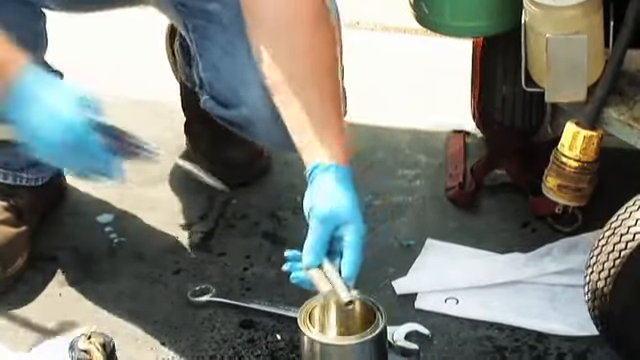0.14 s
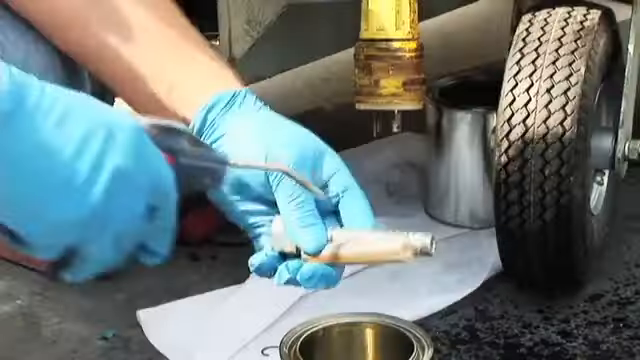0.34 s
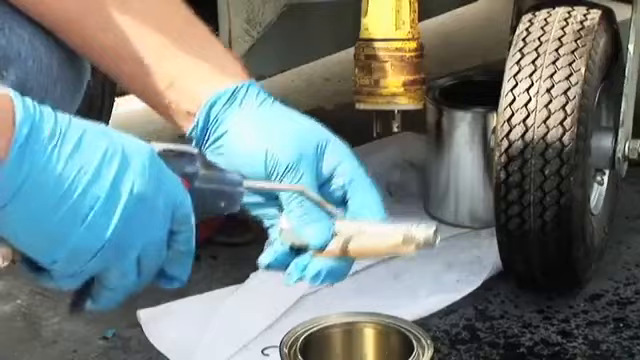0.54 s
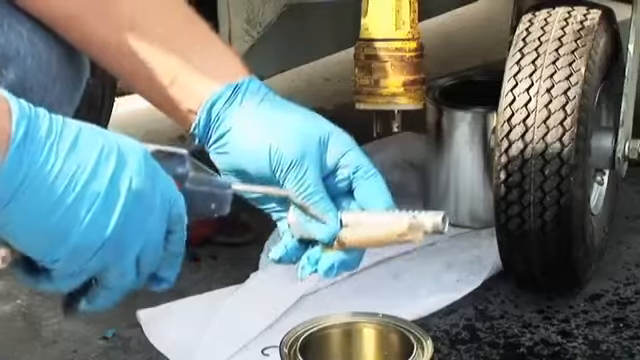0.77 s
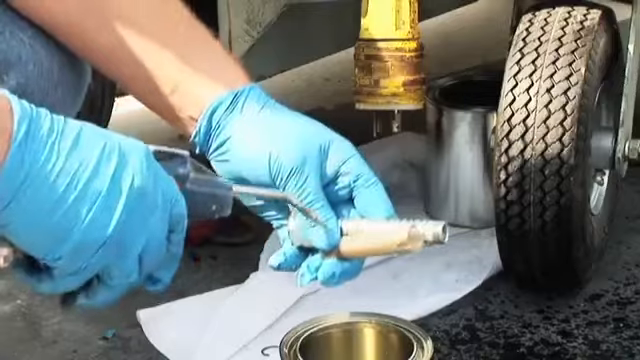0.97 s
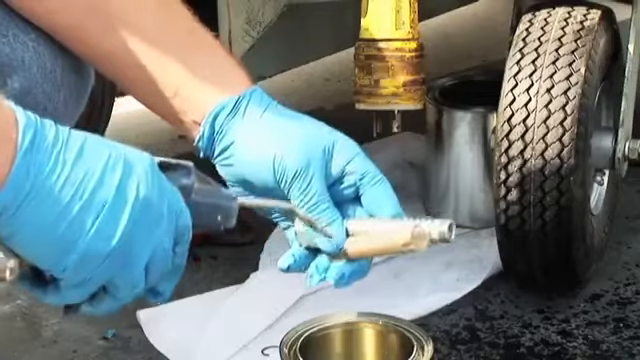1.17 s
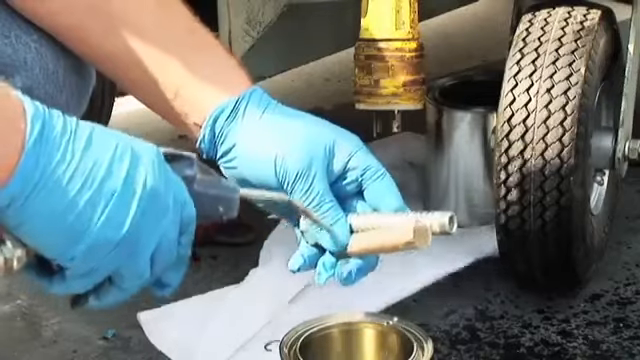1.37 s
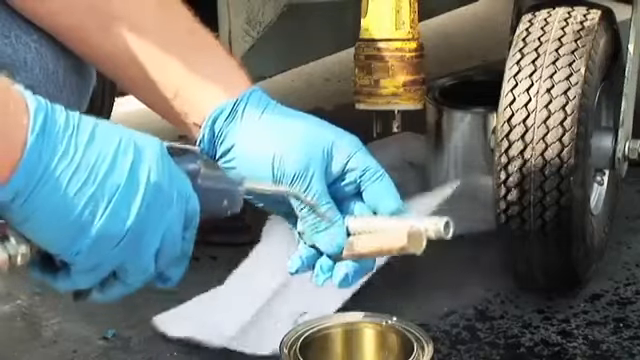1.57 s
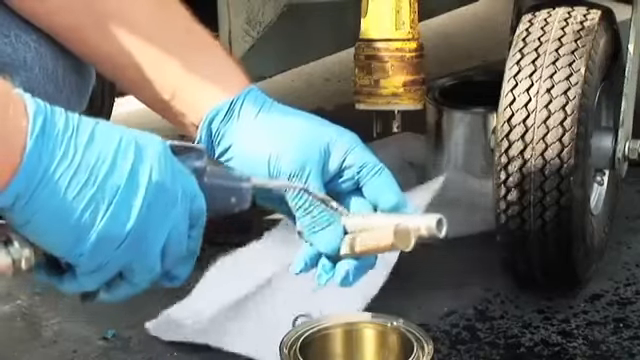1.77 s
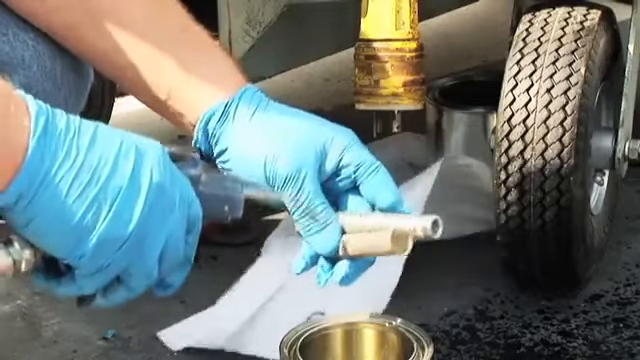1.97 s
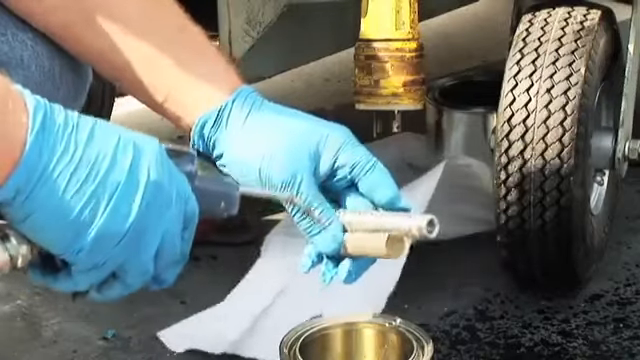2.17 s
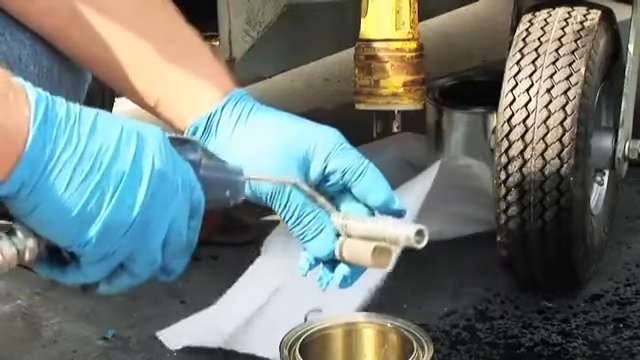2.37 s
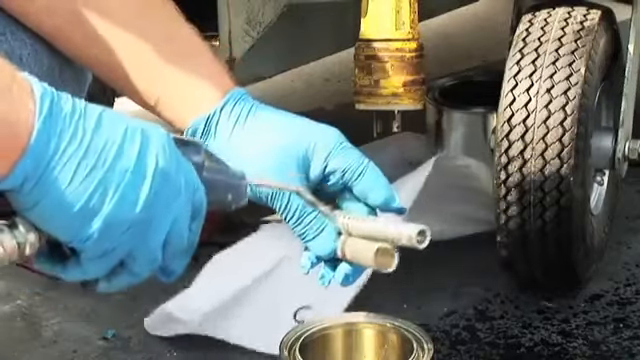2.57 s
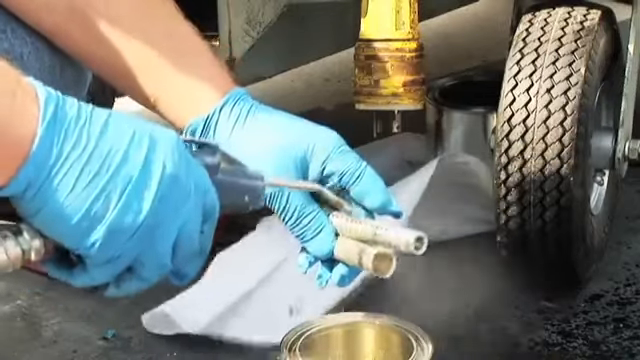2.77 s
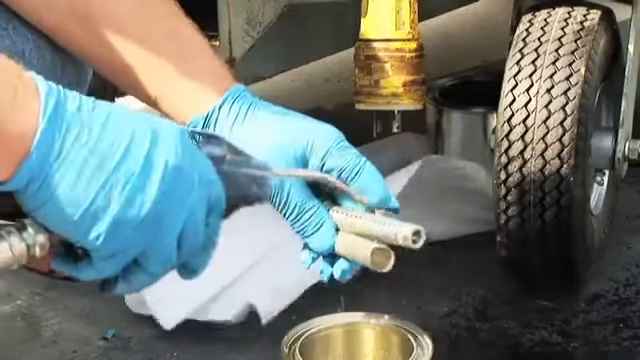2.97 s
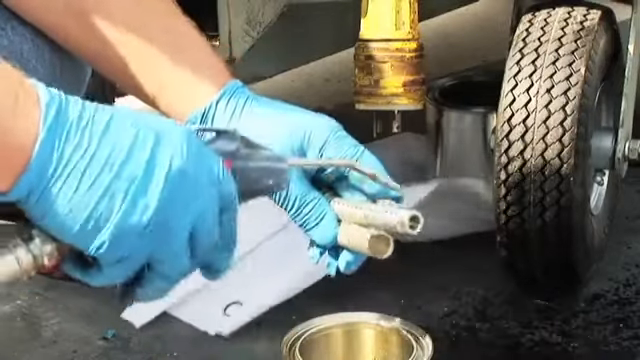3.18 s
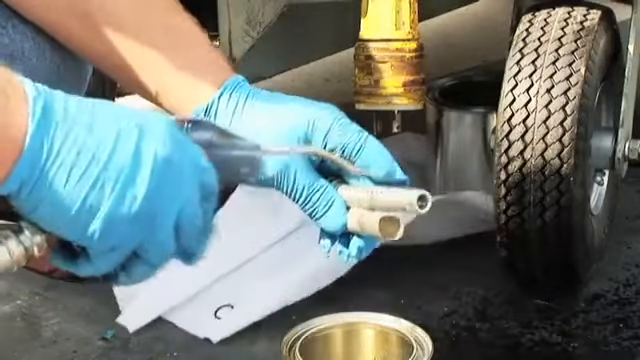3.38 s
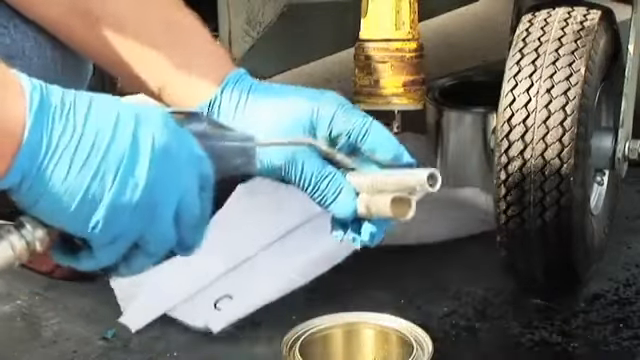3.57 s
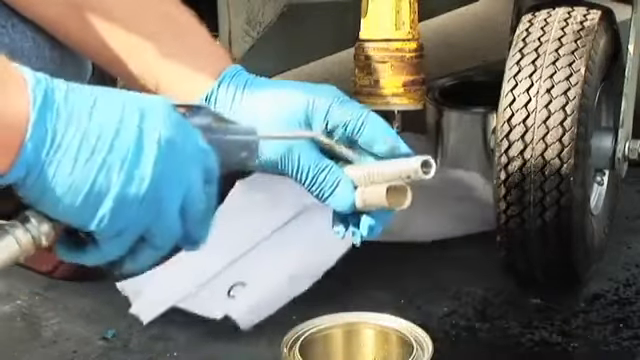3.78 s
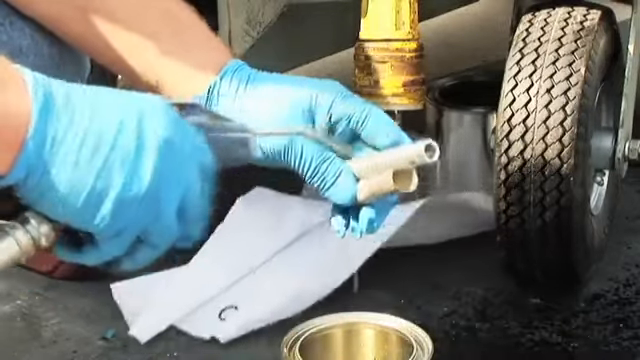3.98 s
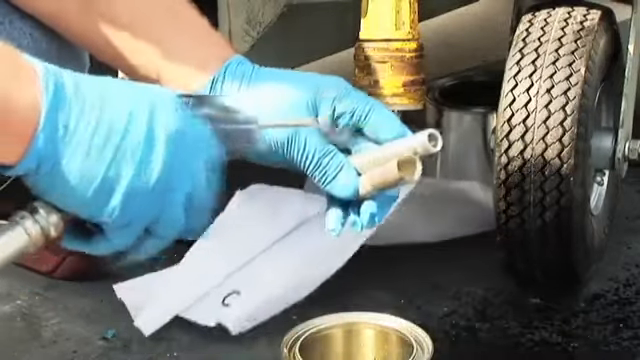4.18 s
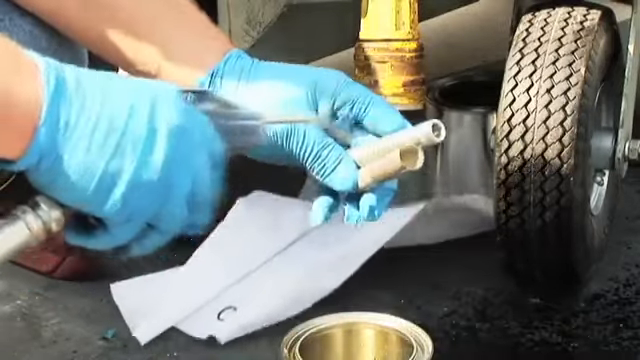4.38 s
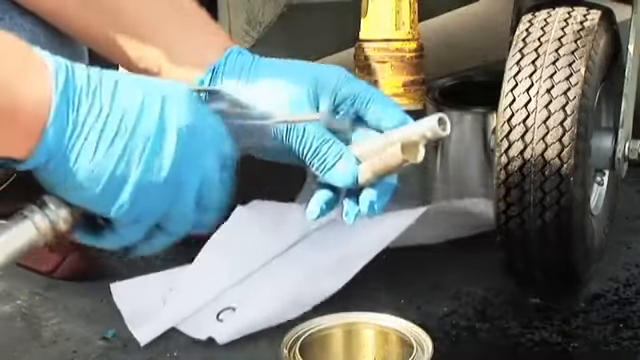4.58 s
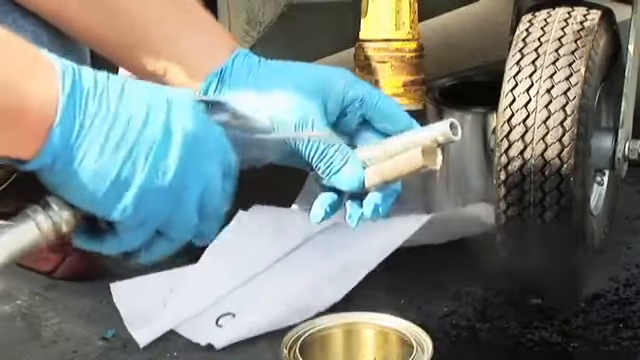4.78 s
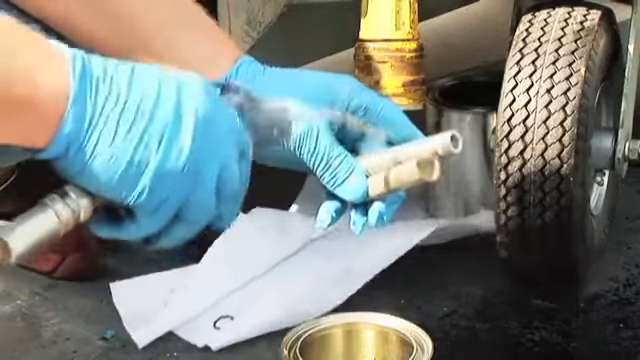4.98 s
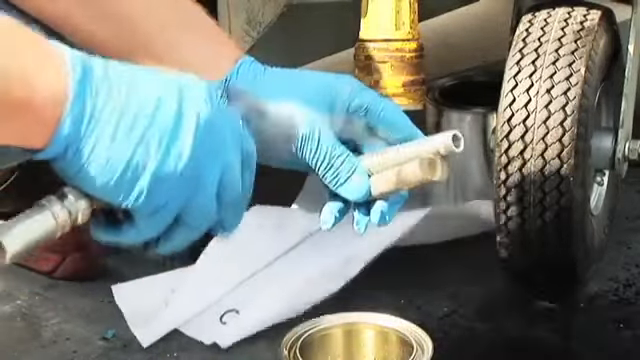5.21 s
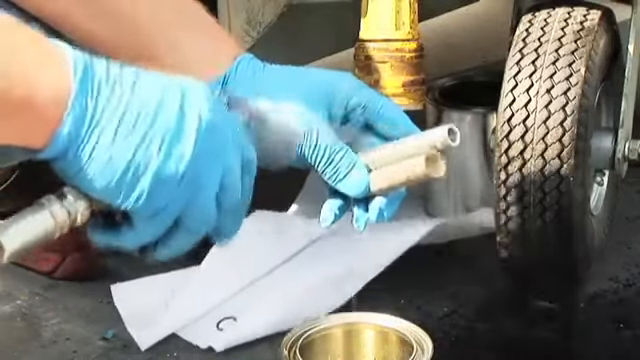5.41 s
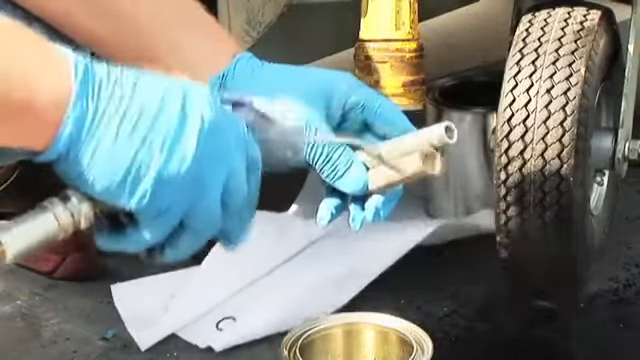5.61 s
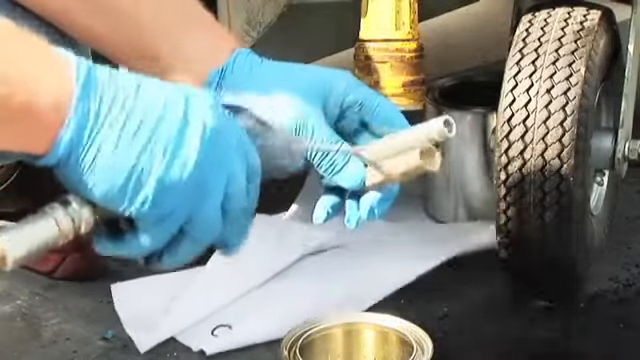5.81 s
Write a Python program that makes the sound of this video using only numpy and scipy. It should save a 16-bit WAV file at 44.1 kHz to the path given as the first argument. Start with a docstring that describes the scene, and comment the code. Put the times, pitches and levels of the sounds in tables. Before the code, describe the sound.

A close air blow gun ticks, seeps, then blasts in long harsh hisses with whistling howls and fluttering splashes, pausing briefly midway.

```python
"""First comes the low hum of a workshop, with ticks of the hose as a compressed-air blow gun is lifted close by,
creaks of thin rubber gloves and a few faint chirps. The half-open valve then breathes through the gun's long wand.
At full trigger the jet dries a small metal part in a gloved hand: it hisses, howls in the part's hollows,
splits on its rim and splashes off glove and floor. Filtered noise makes the air, sines the motor and chirps.
The picture is stereo: noise is central in the bass and wider in the treble; hum lines and chirps are central."""
import sys
import numpy as np
from scipy import signal
from scipy.fft import rfft, irfft
from scipy.io import wavfile
from scipy.ndimage import uniform_filter1d

SR = 44100
rng = np.random.default_rng(int(sys.argv[2]) if len(sys.argv) > 2 else 0)


def wrap_up_sound(samples):
    """Save the sound to the file named by the first command line argument, as 16-bit audio."""
    columns = np.atleast_2d(samples).T
    # keep every value between -1 and 1, then stretch to whole-number steps
    tamed = np.clip(columns, -1, 1)
    steps = np.round(tamed * 32767).astype(np.int16)
    wavfile.write(sys.argv[1], SR, steps)


N = 257984

# Stereo spread of all noise. Each row: frequency in Hz, side against mid in dB.
STEREO_WIDTH = [(3500, -90), (4600, -26), (6000, -12), (7500, -7), (11000, -7), (14000, -7), (15000, -14)]

# Steady lines of the motor hum. Each row: frequency in Hz, level in dB against HUM_DB.
MOTOR_LINES = [(59.2, 0.5), (79, -23), (150.5, -20.5), (226.6, -23.5), (2420, -36), (5100, -44)]
# Spectrum of the workshop's rumble. Each row: frequency in Hz, relative density in dB per Hz.
RUMBLE_SPECTRUM = [(15, -30), (30, -13), (45, -13), (70, -6), (100, -14), (150, -22), (200, -24.5),
                   (330, -31.5), (600, -37.5), (1300, -40.5), (3000, -47.5), (4500, -54), (6800, -61),
                   (8300, -53), (10000, -58.5), (14500, -55)]
HUM_DB = -36
# Splash level around which the hum starts to sink, dB it then sinks per dB of splash, smoothing in seconds.
HUM_SINKS_ABOVE_DB, HUM_SINK_SHARE, HUM_SINK_S = -41.5, 0.92, 0.17

# Ticks of hose, glove and trigger. Each row: start in seconds, body level in dB, snap level in dB.
HANDLING_TICKS = [(.1765, -55, -47), (0.2185, -42, -47), (0.2363, -47, -42), (0.263, -47, -43),
                  (.289, -48, -51), (.3004, -47, -44), (0.3108, -42, -39), (0.955, -47, -62),
                  (3.2654, -36, -50)]
# Dull part of a tick. Each row: centre in Hz, width in Hz, relative height in dB.
TICK_BODY_MODES = [(2920, 560, 7), (4930, 1400, -11)]
# Bright part of a tick. Each row: centre in Hz, width in Hz, relative height in dB.
TICK_SNAP_MODES = [(9000, 2500, -18), (13200, 1700, 8)]
# Gloves crease as the grip changes. Each row: middle in seconds, level in dB before crinkling, length in seconds.
GLOVE_CREASES = [(.255, -61, .05), (.395, -61, .015), (.465, -64, .018), (0.608, -62, .03), (.71, -66, .06)]
# Faint chirps. Each row: middle in seconds, level in dB, start pitch in Hz, end pitch in Hz, length in seconds.
CHIRP_TONES = [(.678, -62, 3820, 3720, 0.0079), (.738, -45.5, 3900, 3900, .008),
               (0.783, -53, 4000, 3950, .004), (0.797, -41.5, 4060, 3990, 0.0046),
               (0.808, -52, 3840, 3800, 0.0089)]

# Trigger half pressed, air seeps through the wand.
# Each row: opens in seconds, shuts in seconds, level in dB at full flow.
HALF_PRESSES = [(0.961, 1.07, -49.5), (1.101, 1.486, -40.5), (1.536, 1.58, -25), (3.145, 3.26, -36.5),
                (3.274, 3.348, -48)]
LEAK_RISE_S, LEAK_FALL_S = 0.013, 0.025
# Pipe resonances of the wand. Each row: centre in Hz, width in Hz, relative height in dB.
WAND_MODES = [(2130, 950, -10.5), (2760, 300, 2.5), (3880, 230, 2), (5100, 210, -1.5), (6300, 310, -14.5),
              (7600, 250, -16), (8780, 350, -16), (10020, 300, -12), (11300, 500, -15), (12550, 500, -16),
              (13900, 800, -23), (14850, 400, -20)]
# Thin hiss of the seeping air. Each row: frequency in Hz, level in dB on the scale of the wand's heights.
LEAK_HISS_SPECTRUM = [(500, -40), (1800, -22), (4500, -27), (7000, -34), (11000, -23), (15000, -18)]

# Trigger pulled through. Each row: opens in seconds, shuts in seconds, rise in seconds, fall in seconds.
FULL_PULLS = [(1.299, 1.424, 0.0078, 0.0093), (1.557, 3.158, 0.02, 0.021), (3.421, 5.95, 0.017, .02)]
# Hollows of the part and the hand. Each row: centre in Hz, width in Hz, relative height in dB.
HOLLOW_MODES = [(1113, 300, -11.5), (1720, 230, -9.5), (2150, 256, -2), (2630, 440, -0.5),
                (3015, 310, -1.5), (3520, 600, -5), (4075, 354, 0.5)]
# Broad humps in the nozzle's hiss. Each row: centre in Hz, width in Hz, relative height in dB.
HISS_MODES = [(8000, 2100, -11.5), (8910, 930, -6.5), (10060, 660, -3), (10890, 610, -3.5),
              (11630, 880, -2), (12700, 460, -0.5), (13300, 1800, -3.5), (14560, 1430, -3.5)]
# Air splitting on the rim of the part. Each row: centre in Hz, width in Hz, relative height in dB.
RIM_MODES = [(5033, 330, 0), (5160, 220, -7), (5700, 570, -7.5), (6300, 400, -17)]
# Air splashing off glove and floor. Each row: frequency in Hz, relative density in dB per Hz.
SPLASH_SPECTRUM = [(40, -25), (90, -7), (160, 1), (330, 0), (520, -1.5), (800, -5), (1300, -6.5),
                   (1800, -16.5), (3000, -21.5), (7200, -7.5), (10000, -14.5)]
# Slow drift of the aim between the hollows and the glove and floor.
# Each row: time in seconds, howl level in dB, splash level in dB before a fixed lift in jet().
AIM_DRIFT = [(1.3, -19, -44), (1.34, -17, -43), (1.6, -18, -41.5), (1.83, -17, -43.5), (2.11, -21, -43),
             (2.2, -21, -28), (2.55, -20, -35), (2.88, -21.5, -29), (3.08, -24, -33.5),
             (3.43, -21.5, -46.5), (3.53, -18, -52), (3.6, -25, -40.5), (3.8, -24.5, -38),
             (4.3, -22.5, -37.5), (4.88, -24, -39.5), (4.98, -17.5, -43.5), (5.2, -23.5, -46),
             (5.58, -25, -50.5), (5.85, -24, -48)]
# Pitch of the hollow that the jet points at, one list for each long blast. Each row: time in seconds, pitch in Hz.
AIMED_HOLLOW = [
    [(1.58, 2900), (1.82, 3360), (2.102, 2940), (2.174, 3470), (2.68, 3320), (2.702, 3630), (2.784, 3160),
     (3.13, 3240)],
    [(3.44, 2980), (3.92, 3420), (3.94, 3310), (4.92, 3500), (4.95, 3230), (5.24, 3300), (5.26, 3360),
     (5.85, 3100)],
]
# The hand sweeps the jet across the part. Each row: middle in seconds, length in seconds,
# then the rise in dB of splash, howl, rim noise and hiss.
HAND_PASSES = [(1.391, 0.066, -1.5, 0.5, 4, 3.5), (1.6, 0.036, -3, 3, 2, -2), (1.71, 0.074, 1, 0.5, 3.5, 2),
               (1.938, 0.082, 6.5, 1.5, 2, 2), (2.17, 0.053, -0.5, 2.5, -2, 4.5), (2.42, 0.1, 2, 0, 0.5, 0),
               (3.123, 0.049, 4, 2.5, 3, 2.5), (3.562, 0.028, 10, 0.5, 5.5, 2),
               (3.626, 0.037, 6, 4, 4.5, 3), (3.703, .1, 10.5, 3, 2, 2), (3.852, 0.022, -1, 3.5, 10, 4),
               (3.965, 0.16, 3, 3.5, 3.5, 2), (4.154, 0.1, 2, 5.5, 4, 3), (4.372, 0.094, 3, 4.5, 5, 2.5),
               (4.585, 0.16, 1.5, 5.5, 3.5, 2.5), (4.776, 0.17, 1, 4, 2, 2), (5.11, 0.13, 8.5, 1.5, 5, 2.5),
               (5.227, 0.026, 13, 5, -3, 3.5), (5.318, 0.095, 16, 4, 5, 2), (5.497, 0.087, 16, 4, 7, 2),
               (5.686, 0.097, 12, 3, 6.5, 4), (5.85, 0.029, 4, 5, 11, 2)]
# The rush dips briefly. Each row: middle in seconds, change in dB, length in seconds.
BRIEF_DIPS = [(1.822, -2, 0.011), (2.312, -6, 0.017), (3.814, -2, .012), (4.068, -3.5, 0.0098),
              (4.66, -3, 0.011), (4.887, -1.5, 0.011), (5.402, -2, 0.027), (5.59, -2.5, .02)]
PASS_EDGE_S = 0.007  # time the jet takes to slide on or off the part
# Levels at the usual splash, and the share of the splash's swing in dB that each follows.
HISS_DB, HISS_FOLLOWS = -22.5, 0.25
RIM_DB, RIM_FOLLOWS = -32, 0.18
RIM_BRIGHTENS = 1.6  # tilt in dB per octave for each dB that the rim noise rises
USUAL_SPLASH_DB = -42  # on the scale of the aim's splash column
# Hand, floor, tin and tyre throw the sound back. Each row: mean delay in seconds, level in dB against the direct sound.
CLOSE_ECHOES = [(.0014, -16), (.0023, -16), (.0037, -17), (.0068, -18)]

# The jet catches a hollow and barks. Each row: middle in seconds, level in dB, pitch in Hz, length in seconds.
HOLLOW_BARKS = [(1.787, -11, 3020, 0.0037), (2.288, -14.5, 3720, 0.011), (2.31, -19, 2870, 0.014),
                (2.635, -17.5, 3040, 0.0087), (3.665, -20.5, 3000, 0.0073), (4.205, -18.5, 2980, 0.015),
                (4.577, -14, 3600, 0.01), (4.787, -14.5, 3670, 0.011)]
# The jet crosses the mouth of the tube and hoots.
# Each row: middle in seconds, level in dB, pitch in Hz, length in seconds.
TUBE_HOOTS = [(2.8, -25.5, 505, 0.0082), (2.885, -32.5, 505, 0.066), (3.14, -47, 506, 0.022)]
# The valve seats with a soft chuff. Each row: middle in seconds, level in dB, pitch in Hz, length in seconds.
VALVE_CHUFFS = [(3.267, -42, 1850, 0.0072)]
CUTOFF_HZ = 15070


def from_db(db):
    """Amplitude of a level in dB."""
    return 10 ** (np.asarray(db) / 20)


def rms_one(x):
    """Scale to an RMS of 1."""
    return x / np.sqrt(np.mean(x ** 2) + 1e-20)


def seconds():
    """The time of each sample."""
    return np.arange(N) / SR


def in_time(rows):
    """Each column of a curve, sample by sample."""
    s, *columns = np.transpose(rows)
    return [np.interp(seconds(), s, column) for column in columns]


def bins():
    """The frequency of each spectral bin, at least 1 Hz."""
    return np.maximum(np.fft.rfftfreq(N, 1 / SR), 1)


def slope(points):
    """Gain per frequency from a short spectrum."""
    hz, db = np.transpose(points)
    return from_db(np.interp(np.log(bins()), np.log(hz), db))


def humps(modes):
    """Gain per frequency of steep-sided resonances whose powers add."""
    power = 0
    for hz, width, db in modes:
        distance = (bins() - hz) / width
        power = power + from_db(db) ** 2 / (1 + 2 * distance ** 2) ** 2
    return np.sqrt(power)


def drift(rate_hz):
    """Slow chance with spread 1: noise whose faster changes fade out above the rate."""
    return rms_one(irfft(rfft(rng.standard_normal(N)) / (1 + (bins() / rate_hz) ** 2), N))


def noise(gain):
    """Coloured stereo noise, mid RMS 1; only the treble differs between the ears."""
    mid, side = rfft(rng.standard_normal((2, N))) * gain
    mid, side = irfft(mid, N), irfft(side * slope(STEREO_WIDTH), N)
    return (mid + side * np.array([[1], [-1]])) / np.std(mid)


def swell(s, length):
    """A bell-shaped envelope; the length is the bell's standard deviation."""
    return np.exp(-.5 * np.minimum(((seconds() - s) / length) ** 2, 200))


def gate(on, off, rise, fall):
    """Opens and shuts smoothly, 0-1."""
    t = seconds()
    opening = (1 + np.tanh((t - on) / rise)) / 2
    shutting = (1 - np.tanh((t - off) / fall)) / 2
    return opening * shutting


def blown(modes, wander_db, wander_rate, favour=lambda hz: 1):
    """Turbulence drives each resonance with a share that wanders; the total power stays 1."""
    out, power = 0, 0
    for hz, width, db in modes:
        share = from_db(db + wander_db * drift(wander_rate)) * np.sqrt(width) * favour(hz)
        out = out + share * noise(humps([(hz, width, 0)]))
        power = power + share ** 2
    return out / np.sqrt(power)


def valve():
    """How far the trigger valve is open, 0-1."""
    return sum(gate(*pull) for pull in FULL_PULLS)


def workshop(splash_db, waver_db=-0.3, phase_waver=0.045, rumble_db=-41, rumble_share=0.37):
    """A motor hums over a soft rumble; both sink while the jet splashes hard."""
    splash_power = (valve() * from_db(splash_db - HUM_SINKS_ABOVE_DB)) ** 2
    splash_power = uniform_filter1d(splash_power, int(HUM_SINK_S * SR))
    sink_db = HUM_SINK_SHARE * 10 * np.log10(1 + splash_power)
    lines = 0
    for hz, db in MOTOR_LINES:
        phase = 2 * np.pi * (hz * seconds() + rng.random()) + phase_waver * drift(7.6)
        lines = lines + from_db(db) * np.sin(phase)
    hum = np.sqrt(2) * from_db(HUM_DB - sink_db + waver_db * drift(14)) * lines
    rumble = from_db(rumble_db - rumble_share * sink_db) * noise(slope(RUMBLE_SPECTRUM))
    return hum + rumble


def ticks(decay_s=0.0018):
    """Each tick is a tiny dry knock with a bright snap, both dying away exponentially."""
    body, snap = 0, 0
    for s, body_db, snap_db in HANDLING_TICKS:
        age = seconds() - s
        decay = (age >= 0) * np.exp(-np.clip(age / decay_s, 0, 60))
        body = body + from_db(body_db) * decay
        snap = snap + from_db(snap_db) * decay
    return body * noise(humps(TICK_BODY_MODES)) + snap * noise(humps(TICK_SNAP_MODES))


def gloves(crinkle_db=6.5):
    """Thin rubber crinkles in tiny bright bursts."""
    creasing = sum(from_db(db) * swell(s, length) for s, db, length in GLOVE_CREASES)
    crinkle = from_db(-3.5 + crinkle_db * drift(110))  # the cut offsets what the bursts add
    return creasing * crinkle * noise(humps([(3000, 900, -8), (13200, 2800, -4)]))


def chirps(third_db=-17, waver=0.0115):
    """Short, slightly rough tones, level or falling, with a weak third harmonic."""
    out = 0
    for s, db, start_hz, end_hz, length in CHIRP_TONES:
        glide_hz = np.interp(seconds(), [s - length, s + length], [start_hz, end_hz])
        phase = 2 * np.pi * np.cumsum(glide_hz * (1 + waver * drift(300))) / SR
        tone = np.sin(phase) + from_db(third_db) * np.sin(3 * phase)
        out = out + from_db(db) * swell(s, length) * np.sqrt(2) * tone
    return out


def leak(flutter_db=1.5):
    """Slow air sounds the wand's own pipe resonances over a thin hiss."""
    flow = sum(from_db(db) * gate(on, off, LEAK_RISE_S, LEAK_FALL_S) for on, off, db in HALF_PRESSES)
    colour = np.hypot(humps(WAND_MODES), slope(LEAK_HISS_SPECTRUM))
    return flow * from_db(flutter_db * drift(40)) * noise(colour)


def aim():
    """Levels in dB of howl, hiss, rim noise and splash: passes shift them; hiss and rim also follow the splash."""
    rises_db = 0
    for s, length, *rise_db in HAND_PASSES:
        on_part = gate(s - length / 2, s + length / 2, PASS_EDGE_S, PASS_EDGE_S)
        rises_db = rises_db + np.outer(rise_db, on_part)
    splash_rise_db, howl_rise_db, rim_rise_db, hiss_rise_db = rises_db
    howl_db, splash_db = in_time(AIM_DRIFT)
    howl_db = howl_db + howl_rise_db
    splash_db = splash_db + splash_rise_db
    swing_db = splash_db - USUAL_SPLASH_DB
    hiss_db = HISS_DB + HISS_FOLLOWS * swing_db + hiss_rise_db
    rim_db = RIM_DB + RIM_FOLLOWS * swing_db + rim_rise_db
    dip_db = sum(db * swell(s, length) for s, db, length in BRIEF_DIPS)
    return np.array([howl_db, hiss_db, rim_db, splash_db]) + dip_db


def jet(levels_db, focus_octaves=0.17, focus_db=8.0, howl_flutter_db=0.96, hiss_flutter_db=0.78,
        rim_flutter_db=1.0, splash_flutter_db=2.0, shared_db=0.6):
    """The free jet hisses; where it lands it howls in hollows, splits on the rim and splashes."""
    howl_db, hiss_db, rim_db, splash_db = levels_db
    centre_hz, = in_time(np.concatenate(AIMED_HOLLOW))

    def aimed(hz):
        """The hollow that the jet points at is favoured."""
        octaves_off = np.log2(hz / centre_hz)
        return from_db(focus_db * np.exp(-.5 * (octaves_off / focus_octaves) ** 2))

    def brightened(hz):
        """The harder the jet meets the rim, the brighter it splits."""
        return from_db(RIM_BRIGHTENS * (rim_db - RIM_DB) * np.log2(hz / RIM_MODES[0][0]))

    howl = blown(HOLLOW_MODES, wander_db=1.77, wander_rate=8, favour=aimed)
    howl = from_db(howl_db + howl_flutter_db * drift(57)) * howl
    hiss = blown(HISS_MODES, wander_db=2.5, wander_rate=16.5)
    hiss = from_db(hiss_db + hiss_flutter_db * drift(30)) * hiss
    rim = blown(RIM_MODES, wander_db=2.1, wander_rate=14, favour=brightened)
    rim = from_db(rim_db + rim_flutter_db * drift(23)) * rim
    splash = from_db(splash_db + 3.5 + splash_flutter_db * drift(73)) * noise(slope(SPLASH_SPECTRUM))
    # the whole jet flaps, so all its voices shiver together
    return valve() * from_db(shared_db * drift(33)) * (howl + hiss + rim + splash)


def nearby(x, sway_s=0.0002, sway_rate=1.7):
    """Close echoes whose paths change as the hands move, so that their colouring keeps shifting."""
    t, out = seconds(), x
    for delay, db in CLOSE_ECHOES:
        then = t - delay - sway_s * drift(sway_rate)
        out = out + from_db(db) * np.array([np.interp(then, t, ear) for ear in x])
    return out / np.sqrt(1 + sum(from_db(db) ** 2 for _, db in CLOSE_ECHOES))


def cavity_tones(events, width_hz):
    """For a moment the air sounds one cavity: a narrow band of noise swells and fades."""
    out = 0
    for s, db, hz, length in events:
        out = out + from_db(db) * swell(s, length) * noise(humps([(hz, width_hz, 0)]))
    return out


def scene():
    """The gun and its small sounds, close by, over the workshop's hum."""
    levels_db = aim()
    background = workshop(splash_db=levels_db[-1])
    handling = ticks() + gloves() + cavity_tones(VALVE_CHUFFS, width_hz=860)
    gun = nearby(leak() + jet(levels_db))
    gun = gun + cavity_tones(HOLLOW_BARKS, width_hz=440) + cavity_tones(TUBE_HOOTS, width_hz=22)
    return background + handling + chirps() + gun


def record(dry):
    """The top is cut steeply; any peak beyond full scale is clipped."""
    lowpass = signal.firwin(501, CUTOFF_HZ, fs=SR)
    cut = signal.fftconvolve(dry, lowpass[None], mode="same", axes=1)
    return np.clip(cut, -1, 1)


dry = scene()
out = record(dry)
wrap_up_sound(out)
```